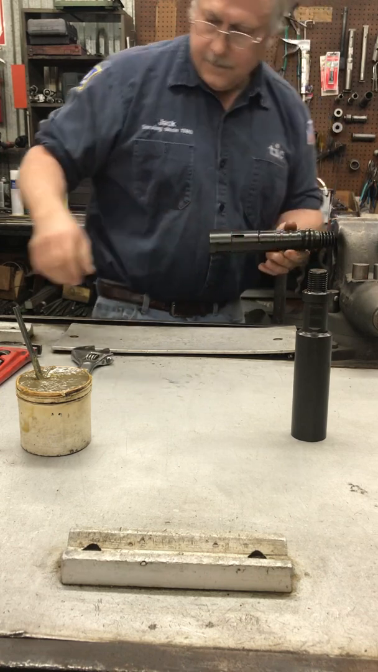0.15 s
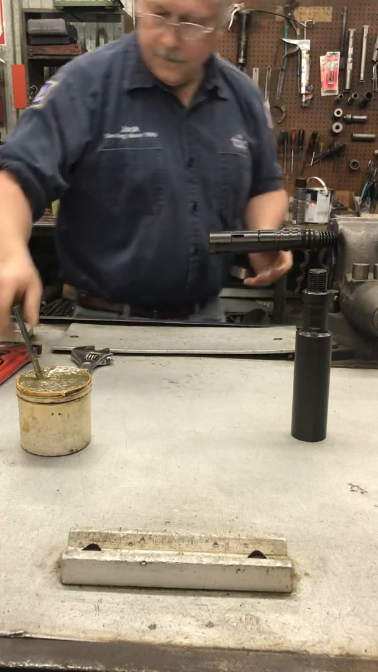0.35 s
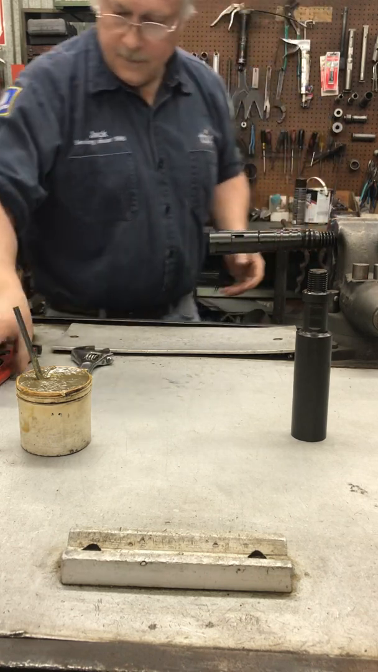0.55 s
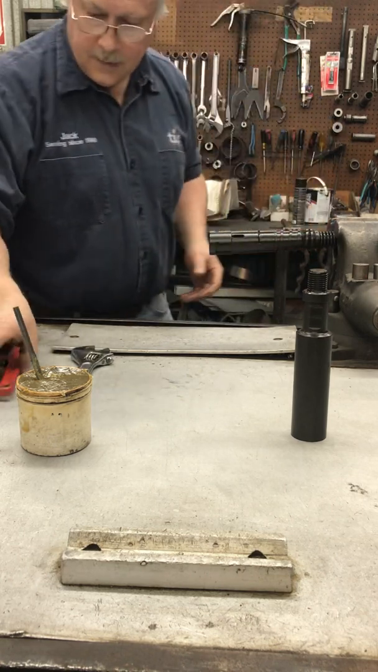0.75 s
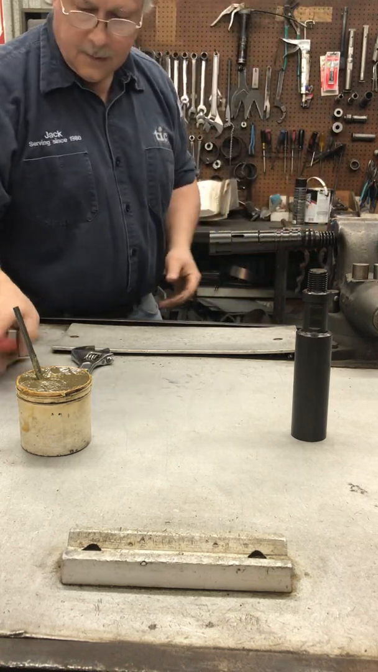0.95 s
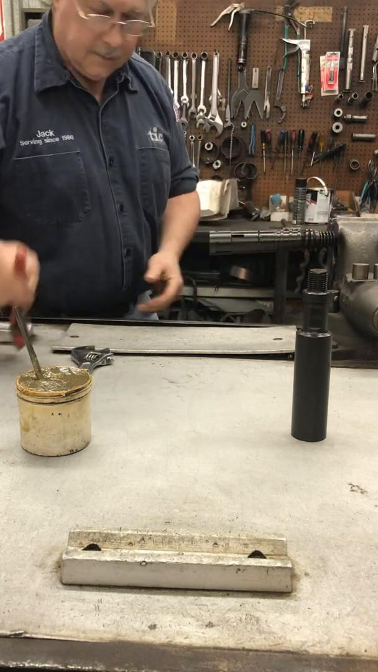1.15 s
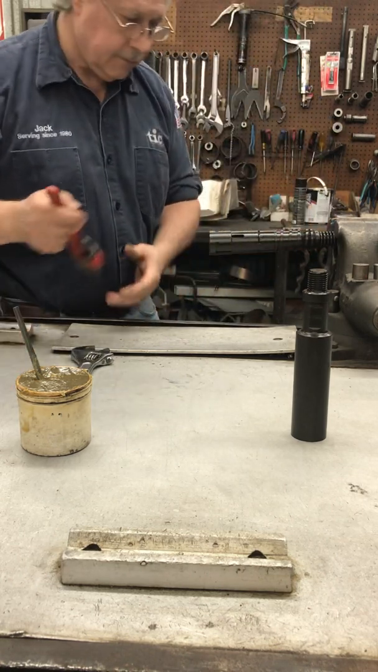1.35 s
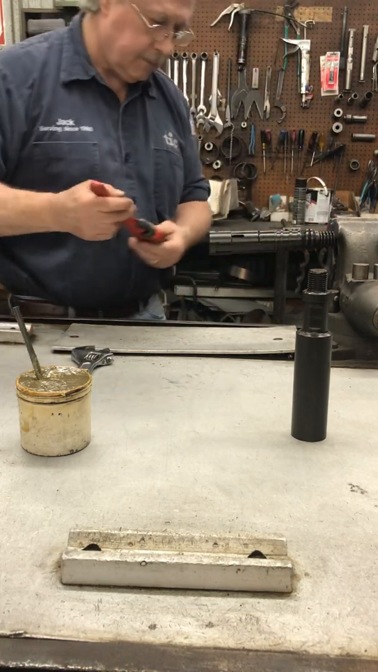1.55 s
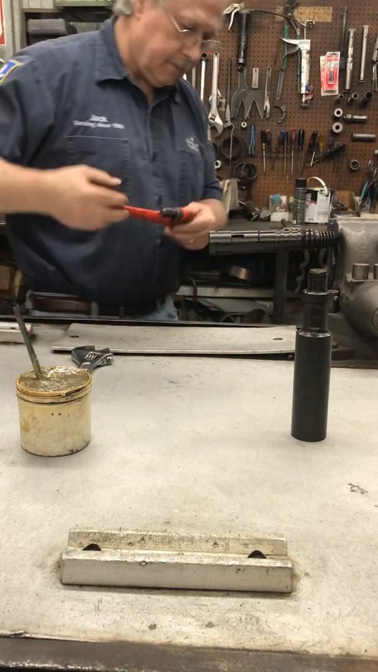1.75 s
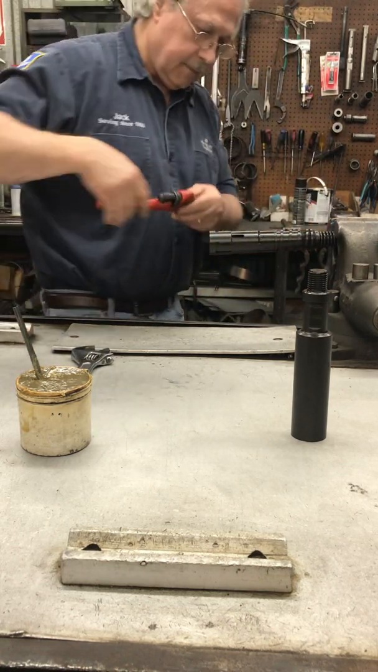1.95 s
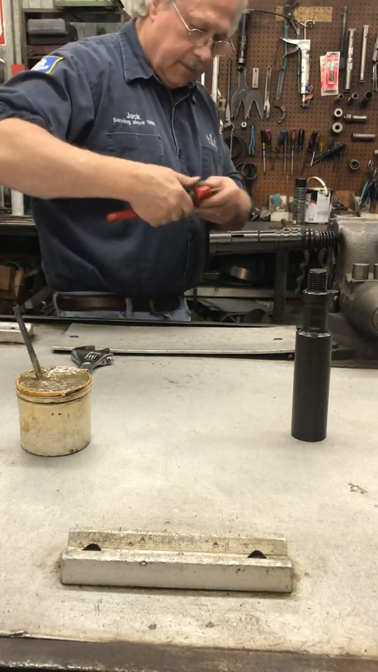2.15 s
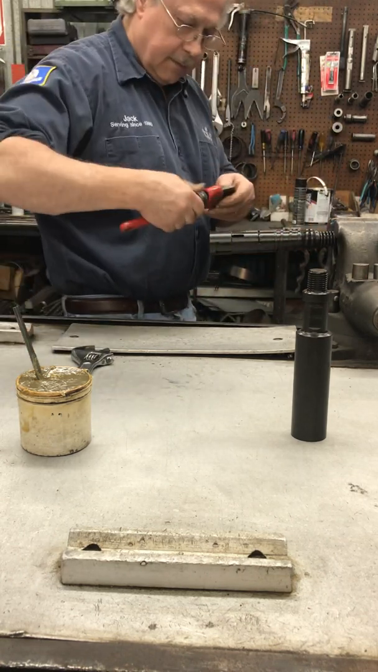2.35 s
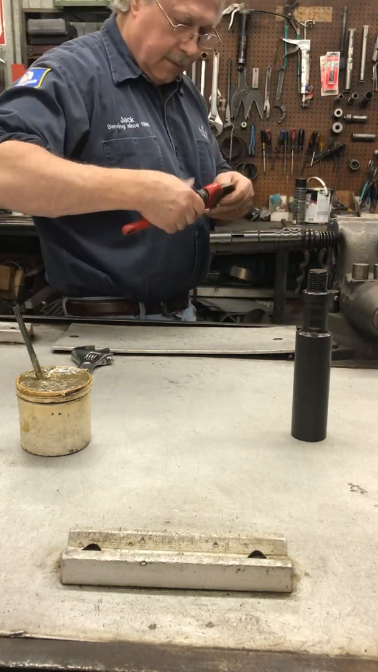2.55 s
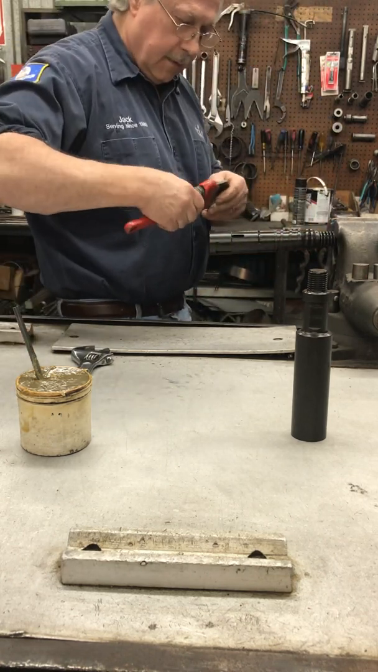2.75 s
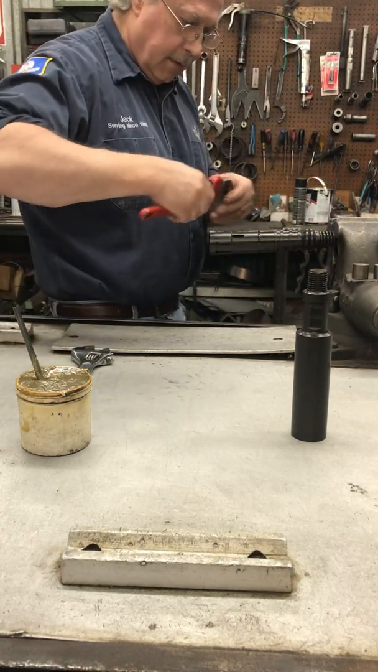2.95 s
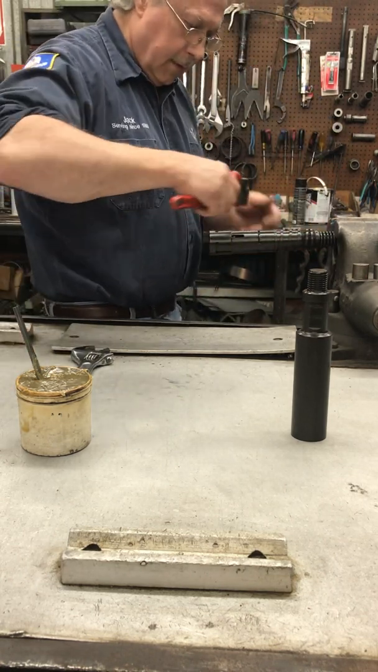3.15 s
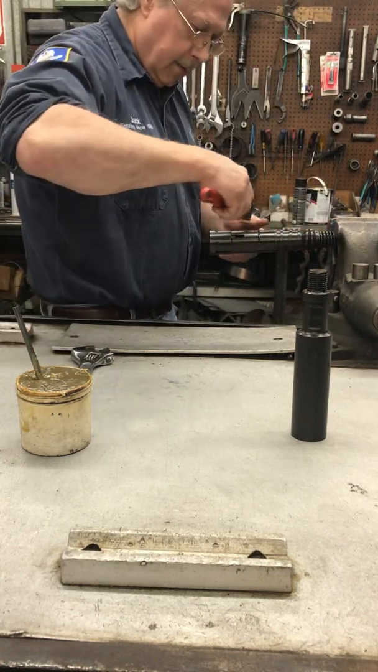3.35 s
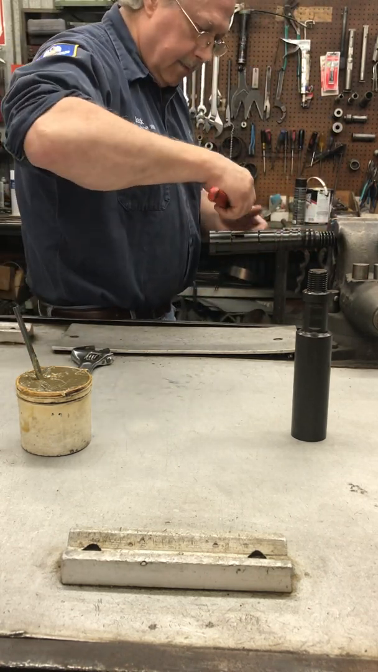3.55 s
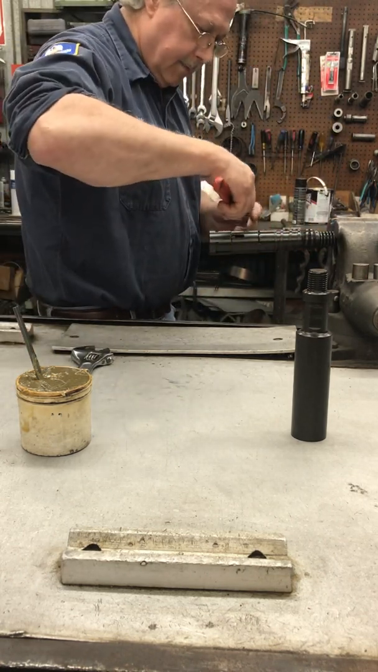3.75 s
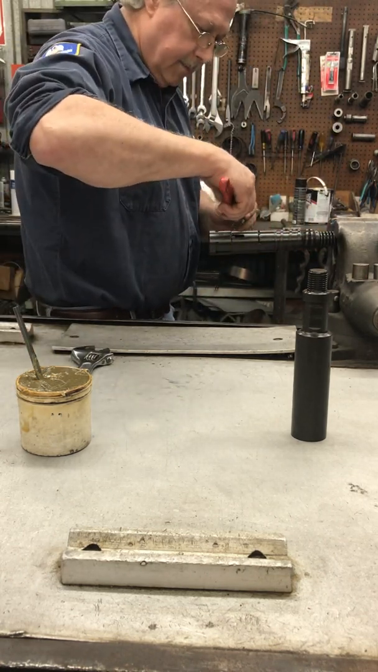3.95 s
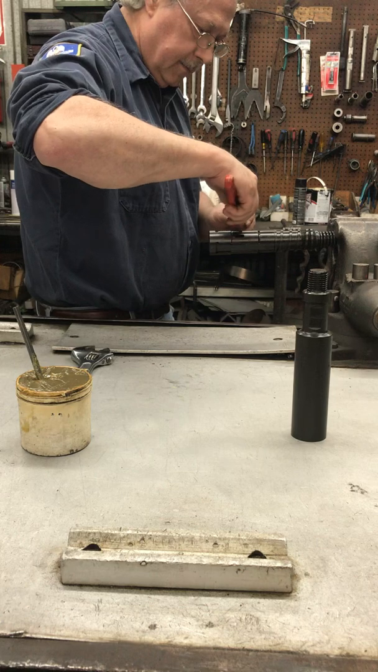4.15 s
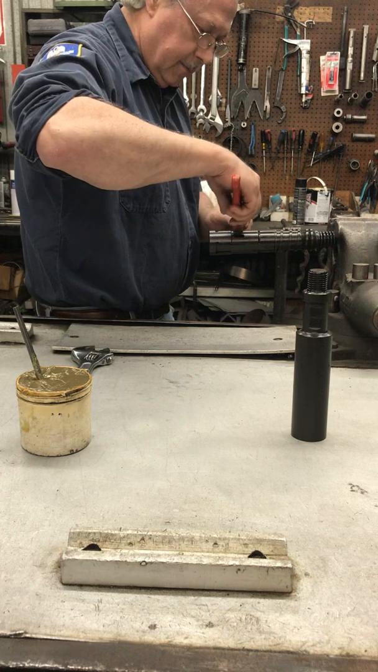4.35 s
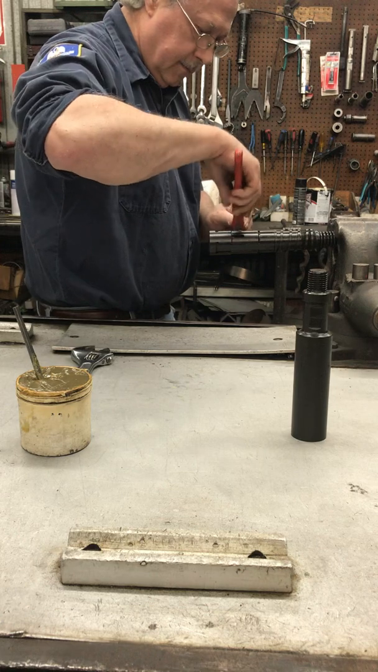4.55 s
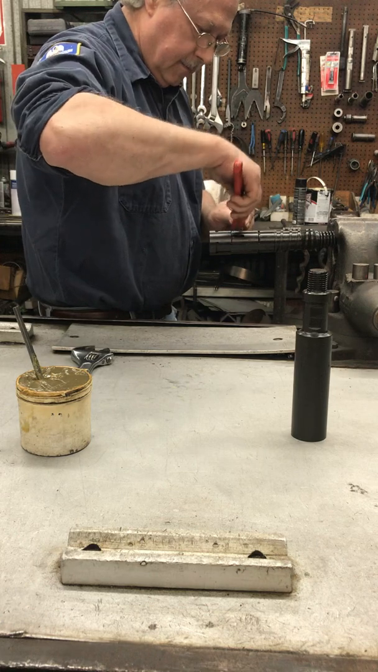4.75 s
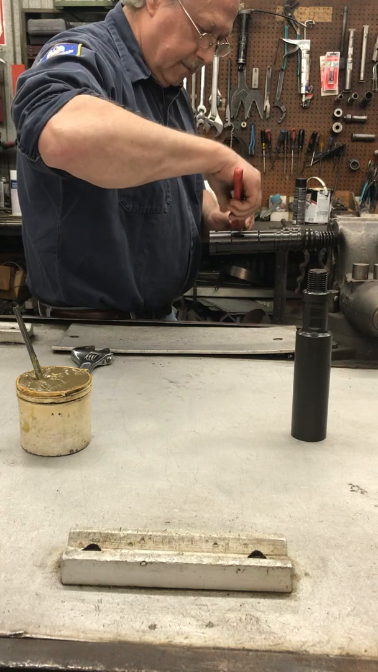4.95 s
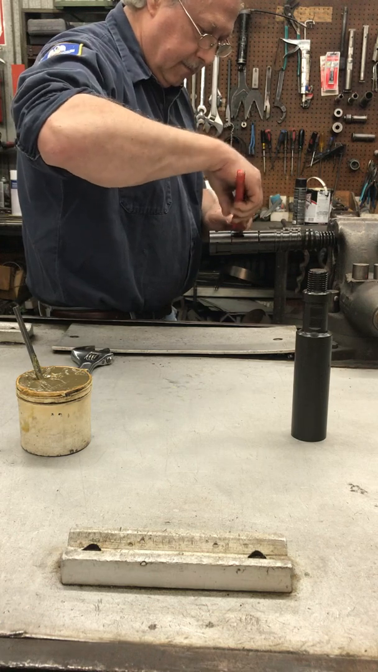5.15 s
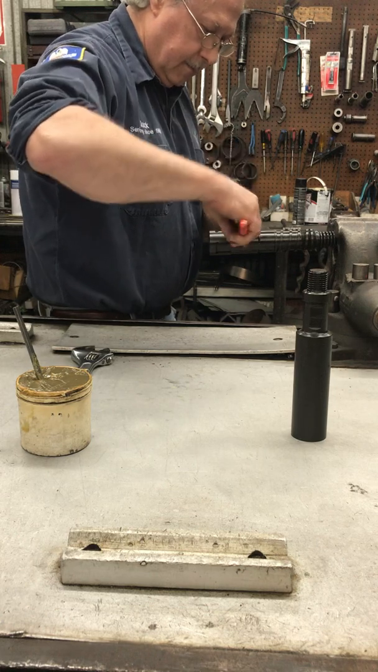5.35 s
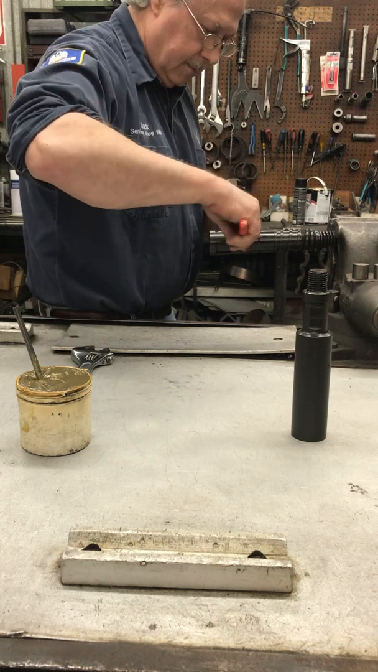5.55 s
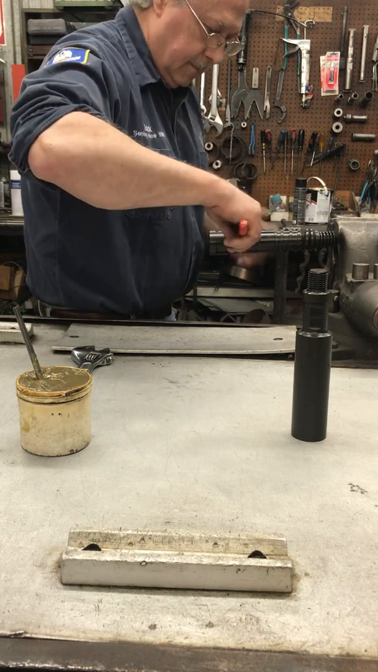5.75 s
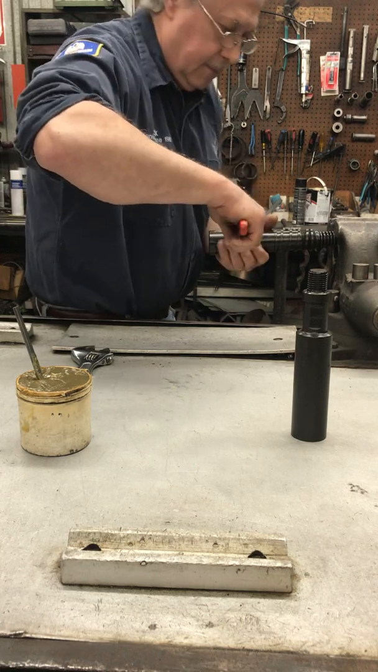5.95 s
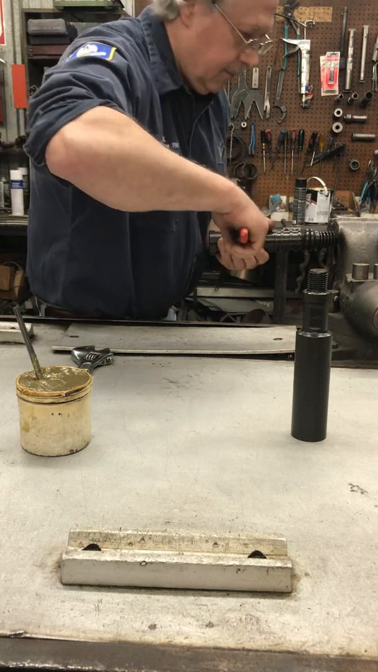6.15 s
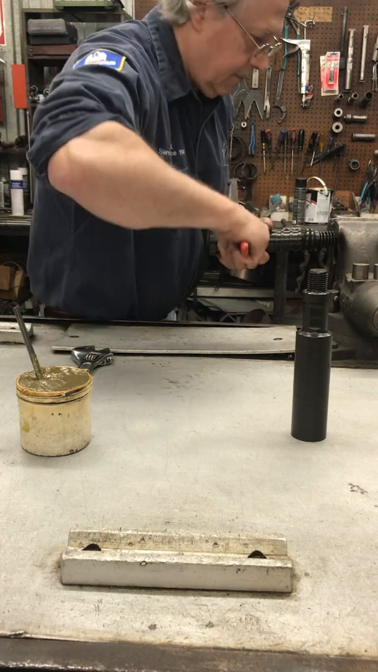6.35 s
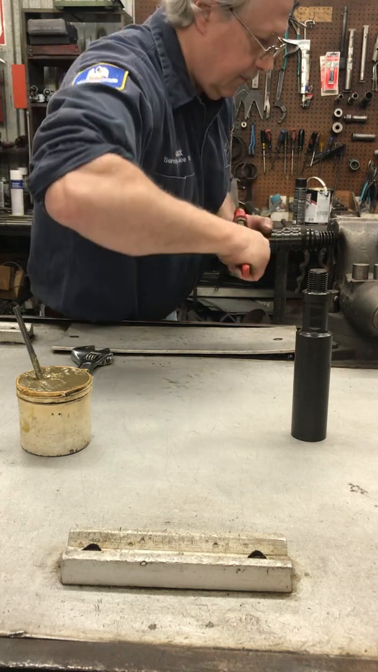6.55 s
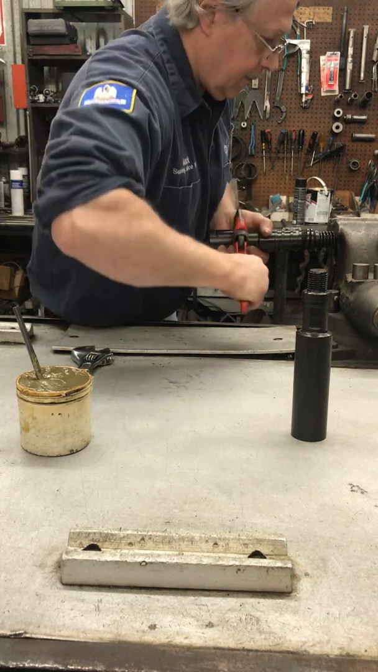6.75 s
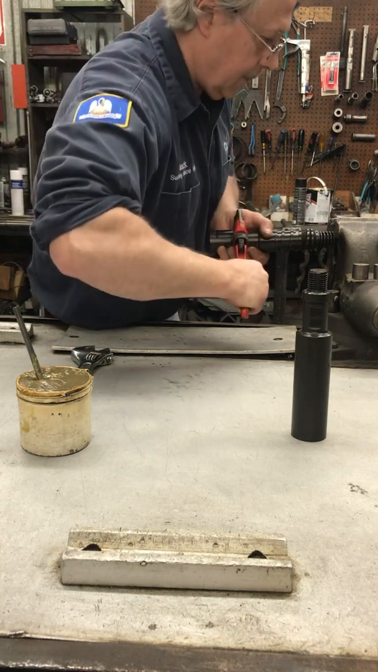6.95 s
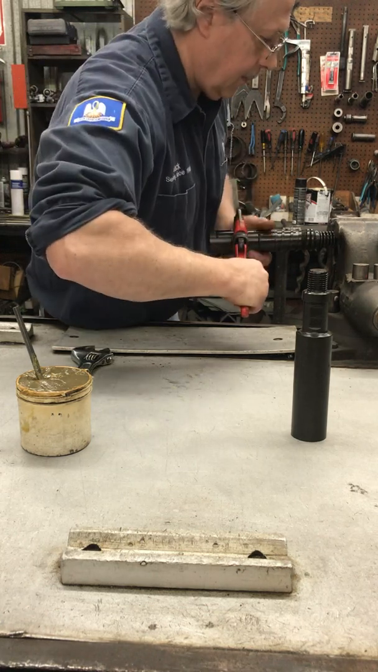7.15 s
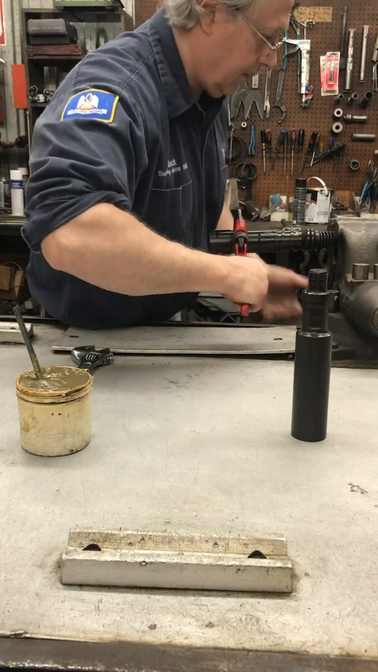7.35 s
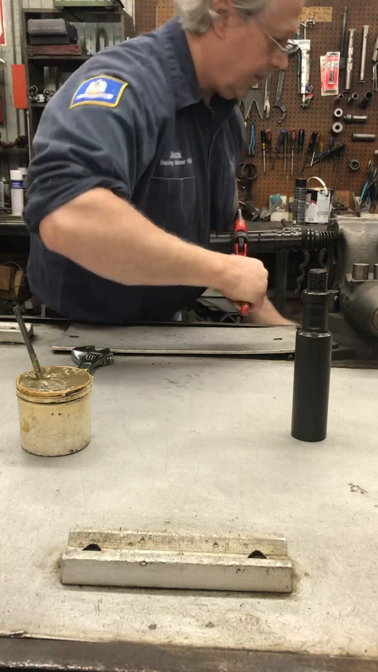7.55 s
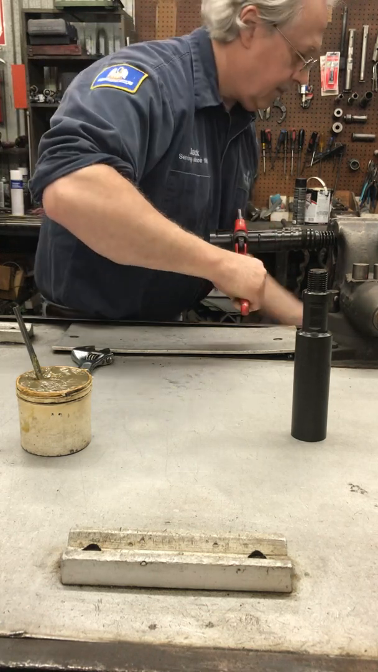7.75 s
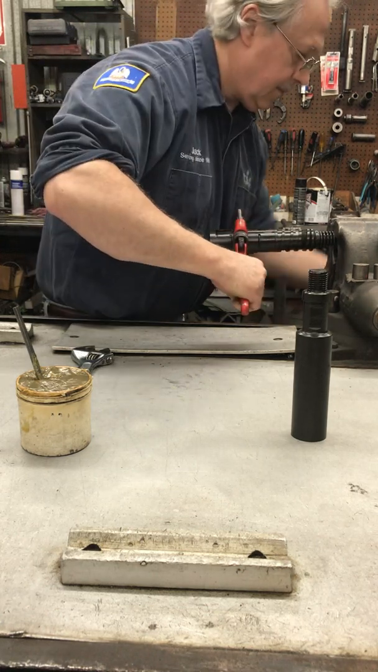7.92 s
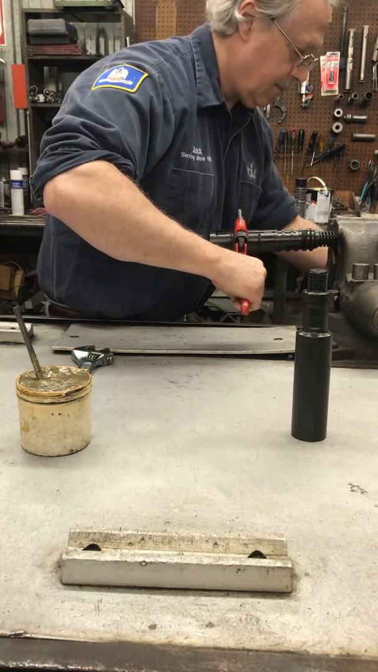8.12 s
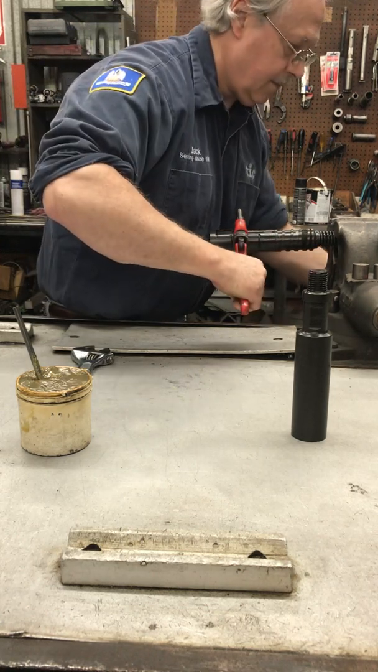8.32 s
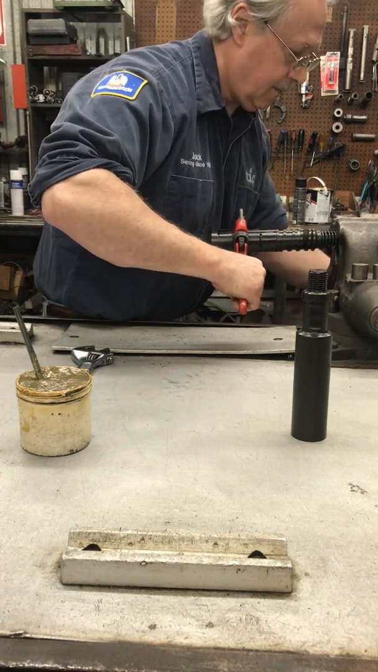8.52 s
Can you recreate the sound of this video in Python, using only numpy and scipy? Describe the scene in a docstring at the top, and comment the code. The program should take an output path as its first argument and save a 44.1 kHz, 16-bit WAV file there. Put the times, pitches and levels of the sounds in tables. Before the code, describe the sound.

A heavy steel wrench scrapes off a metal bench with two loud clanks, then light clicks and ticks as it is adjusted over a low workshop hum.

```python
"""A pipe wrench is dragged off a steel workbench with two loud clanks, adjusted by hand and set on a pipe in a vise.
Clanks mix a bending-wave crack, a noise thud and ringing bench modes; the drag is a stream of tiny slips.
Loose jaw, nut, handle, pipe and vise click as noise bursts and ring as fluttering modes; soft bumps are noise swells.
Machinery hums as shaped noise and wavering tones, and a faint electrical tick repeats about ten times a second."""
import sys
import numpy as np
from scipy import signal
from scipy.fft import rfft, irfft, next_fast_len
from scipy.io import wavfile
from scipy.ndimage import uniform_filter1d, minimum_filter1d

SR = 44100
rng = np.random.default_rng(int(sys.argv[2]) if len(sys.argv) > 2 else 0)


def transcribe(signal):
    """Save signal, clipped to [-1, 1], as a 16-bit WAV file at the path in sys.argv[1]."""
    frames = np.atleast_2d(signal).T
    limited = np.clip(frames, -1, 1)
    pcm = np.round(limited * 32767).astype(np.int16)
    wavfile.write(sys.argv[1], SR, pcm)


N = 382788

# machinery tones: pitch_hz, typical level_db (rms)
MOTOR_TONES = [(55.5, -50.5), (60, -51), (119, -50.5), (208.3, -51), (261, -70), (349, -65.5), (378, -67),
               (526, -74)]
# noise colours, relative levels: pitch_hz, level_db (per Hz)
RUMBLE_COLOUR = [(8, -44.5), (22, -39.5), (33, -16), (44, -9), (54, 3.5), (70, -3), (100, -2.5),
                 (125, -5.5), (160, -10.5), (205, -10), (260, -18.5), (340, -24.5), (480, -37.5),
                 (1200, -73.5)]
AIR_COLOUR = [(200, -4), (400, 3.5), (650, 1.5), (950, -3), (1700, .5), (2050, -4), (2350, -8), (3200, -8),
              (5000, -17.5), (6500, -18), (9000, -25.5), (12000, -24), (13500, -28.5), (16000, -26.5)]
CLICK_COLOUR = [(250, -15), (700, -17), (1500, -12), (2100, -2), (2350, -23.5), (2700, 1.5), (3400, -0.5),
                (4200, -7.5), (5300, -11.5), (6000, -15), (7200, -11), (8000, -22), (13000, -19.5),
                (16000, -20)]
TICK_COLOUR = [(800, -11.5), (2500, 5.5), (4000, 4), (5200, -6), (6600, 4.5), (8500, -17.5), (13000, -9),
               (15500, -6.5)]
SCRAPE_COLOUR = [(150, -27.5), (400, 7.5), (600, 3.5), (1900, -1), (2400, -11), (3200, -6), (4600, -7.5),
                 (5500, -21), (7000, -41.5), (9000, -50.5), (15000, -53)]
CRACK_COLOUR = [(150, -33), (400, -4.5), (700, 7.5), (1900, -1.5), (2400, -13.5), (3300, -1), (4100, 7.5),
                (4900, -7.5), (5800, -10.5), (7000, -26.5), (9000, -44), (16000, -46)]
THUD_COLOUR = [(120, -26), (300, -14.5), (600, -5), (2000, 5.5), (2400, -4.5), (3200, -7.5), (4400, -20),
               (5400, -5), (7200, -27), (8000, -36), (16000, -51.5)]
BUMP_COLOUR = [(60, -10), (130, 7.5), (300, 5.5), (450, -7.5), (800, -5.5), (1400, -14), (2200, -26),
               (3300, -25), (5000, -55), (12000, -62)]

# loose steel parts meeting: start_s, part struck, relative click_db, relative ring_db,
# contact brightness_hz, ring length factor (a grip shortens it)
PART_CLINKS = [(.002, "vise", -43.5, -50.5, 7000, 0.67), (0.64, "jaw", -31, -40, 6400, .35),
               (.887, "jaw", -16, -23.5, 7000, 0.4), (1.095, "jaw", -21, -27, 11000, 0.86),
               (1.101, "nut", -27, -30, 2700, 0.51), (1.608, "jaw", -41.5, -46.5, 7000, 0.27),
               (1.685, "jaw", -38.5, -36.5, 6000, 0.16), (2.317, "nut", -44, -59, 9000, .2),
               (2.39, "nut", -44, -58, 9200, .55), (2.689, "handle", -35, -48, 8950, .4),
               (2.7138, "nut", -25, -31, 7600, 0.55), (2.906, "nut", -50, -55, 4970, .4),
               (2.958, "jaw", -39.5, -47, 4560, 0.44), (3.479, "handle", -41, -56, 8750, 0.88),
               (3.516, "jaw", -28.5, -32.5, 7000, 0.95), (3.763, "nut", -44, -53.5, 9100, 0.39),
               (3.7755, "pipe", -29.5, -38, 8000, 0.15), (3.78, "jaw", -49, -35.5, 11000, .38),
               (3.85, "jaw", -32.5, -35.5, 3970, 0.9), (4.203, "pipe", -54, -40, 2960, 0.59),
               (4.6046, "nut", -41, -62, 6500, .4), (4.792, "nut", -36, -52, 8000, .4),
               (4.797, "handle", -31.5, -30.5, 8900, 0.43), (4.806, "pipe", -27, -36, 9000, 0.47),
               (4.812, "jaw", -35, -40, 6000, 0.86), (4.8308, "pipe", -42, -41, 8000, 0.57),
               (5.2968, "pipe", -28, -19.5, 4470, 0.09), (5.298, "handle", -40, -31.5, 6000, 0.055),
               (5.3414, "nut", -38, -62, 9000, .2)]
# ringing modes of each part, before the grip: pitch_hz, relative level_db, decay_s (to -60 dB)
VISE_MODES = [(2630, -4, 0.32), (4020, -1, 0.44), (6000, -12, .2)]
JAW_MODES = [(3128, -27, .28), (3300, -3, 0.12), (3343, -1, 0.27), (5370, -29, .25), (5770, -16.5, 0.193),
             (6500, -20, 0.37), (6995, -6, 0.41), (7100, -5.5, 0.17), (6900, -18, .2), (10060, -17.5, .28),
             (12700, -22, .22)]
NUT_MODES = [(1290, -5, .13), (2047, -20, .49), (3400, 12.5, 0.067), (3490, -10.5, .48), (3700, -3, 0.25),
             (3800, -15, .41), (8260, -7.5, 0.13), (8570, -1, .48)]
HANDLE_MODES = [(4370, -7, .14), (4820, 2, .3), (5400, -9, .1), (7386, -21, .3), (8400, -9, .33)]
PIPE_MODES = [(2006, -3, 0.17), (2180, -15, 0.49), (2635, 8, 0.2), (2700, -17, .12), (3720, -29, 0.27)]
PARTS = {"jaw": JAW_MODES, "nut": NUT_MODES, "pipe": PIPE_MODES, "handle": HANDLE_MODES, "vise": VISE_MODES}
# a blow throws the loose jaw or nut into a rattle a moment later, at levels relative to the blow
RATTLE_DELAY_S, RATTLE_CLICK_DB, RATTLE_RING_DB = .006, -7.5, -19
SEATING_S = .0016  # the parts take a moment to seat
LOOSENESS = .27  # flutter depth of the ringing parts

TICK_START_S, TICK_PERIOD_S, TICK_GAP_S = .0669, .10234, .0011

# strokes of the wrench sliding on the bench: start_s, time to the peak_s, peak level_db
DRAG_STROKES = [(.493, .032, -34.5), (.556, .068, -32.5), (.79, .085, -47.5), (.895, .035, -32),
                (1.035, .035, -37.5)]
STROKE_ATTACK_S, STROKE_SWELL_DB, STROKE_RELEASE_DB_PER_S = .012, 10.5, 515.5
SLIPS_PER_S = 5000

# steel knocking on bench and vise: start_s, relative level_db, first contact brightness_hz,
# gap to the first bounce_s, change per bounce_db
STEEL_CLANKS = [(.558, -34.5, 7000, 0.018, -15), (0.6278, -16, 4540, 0.016, -3),
                (0.8798, -8, 5900, 0.0062, .6), (1.0, -25.5, 3500, .006, -23), (2.089, -42, 1680, 0.025, 2),
                (4.206, -42, 2460, .01, -5), (5.2973, -35, 7500, .016, -4.5), (5.353, -36.5, 3000, .01, -6),
                (8.24, -35, 893, 0.017, 1)]
BOUNCE_SHRINK, BOUNCE_DULLING = .53, .64  # factors per bounce on the gap and the brightness
# bench modes, before the knock shortens them: pitch_hz, relative level_db, decay_s (to -60 dB)
BENCH_MODES = [(494, -11, 0.077), (622.6, 3, 0.096), (658, -12, 0.11), (700, -8.5, 0.0493), (869, -8, .08),
               (962, 0, 0.067), (1097, -4, 0.15), (1213, -5, .11), (1404, -8.5, 0.32), (1570, -2.5, 0.072),
               (1670, -17, .05), (1850, -7, .072), (1886, 1.5, .045), (2036, .5, .05), (2824, -9, 0.078),
               (3206, -9.5, 0.0617), (3500, -16.5, 0.065), (3690, -15, 0.1), (3880, -10.5, 0.022),
               (3868, -2, 0.04), (4270, -1, 0.053), (4417, 0.5, 0.056), (4660, 4.5, .025),
               (5190, -21, 0.066)]

# soft bumps of hand and tool on the vise: start_s, level_db, swell_s (time to the peak)
SOFT_BUMPS = [(.632, -32.5, 0.0087), (2.087, -48, 0.0091), (5.314, -40.5, 0.013), (8.215, -39, .023),
              (8.295, -49, 0.011), (8.381, -41, 0.0043)]

# room reverberation: pitch_hz, decay_s (to -60 dB)
ROOM_DECAY = [(150, 1), (600, 0.48), (2000, 0.48), (4000, 0.39), (8000, 0.63), (15000, 0.39)]
NOTCH_HZ, NOTCH_Q = 10360, 9.8
CEILING, EDGE_HZ = .85, 15900  # limiter amplitude and top of the band


def gain_of(db):
    """Decibels to amplitude."""
    return 10 ** (np.asarray(db) / 20)


def evened(x):
    """Scales to an rms of one."""
    return x / np.sqrt(np.mean(x ** 2) + 1e-20)


def read(points, hz):
    """Reads a table along a log-frequency axis."""
    f, value = np.transpose(points)
    return np.interp(np.log(hz + 1), np.log(f + 1), value)


def add(mix, start_s, sound):
    """Mixes a sound in at a time."""
    part = mix[max(round(start_s * SR), 0):][:len(sound)]
    part += sound[:len(part)]


def coloured(x, colour):
    """Gives a signal a spectrum, at an rms of one."""
    size = next_fast_len(len(x))
    level_db = read(colour, np.fft.rfftfreq(size, 1 / SR))
    shaped = irfft(rfft(x, size) * gain_of(level_db), size)
    return evened(shaped[:len(x)])


def drift(rate_hz):
    """Slow random wandering up to a rate, at an rms of one."""
    size = next_fast_len(N)
    f = np.fft.rfftfreq(size, 1 / SR)
    slowed = rfft(rng.standard_normal(size)) / (1 + (f / rate_hz) ** 4)
    return evened(irfft(slowed, size)[:N])


def soften(x, brightness_hz):
    """Low-passes a blow: a longer contact excites less treble."""
    return signal.lfilter(*signal.butter(2, min(brightness_hz, .45 * SR), fs=SR), x)


def ring(modes, scatter_db, length=1, rattle=0):
    """Dying modes; where the blow lands shifts strengths and signs, and loose joints make each one flutter."""
    t = np.arange(SR // 2) / SR
    strength, sign = rng.standard_normal(len(modes)), rng.choice([-1, 1], len(modes))
    # complex noise flutters both level and phase
    shake = rng.standard_normal((len(modes), 160, 2)) @ np.array([1, 1j])
    shake_t = np.linspace(0, t[-1], shake.shape[1])
    out = np.zeros(len(t))
    for k, (pitch_hz, level_db, decay_s) in enumerate(modes):
        flutter = 1 + rattle * np.interp(t, shake_t, shake[k])
        fade = gain_of(level_db + scatter_db * strength[k] - 60 * t / (decay_s * length))
        out += sign[k] * fade * (flutter * np.exp(2j * np.pi * pitch_hz * t)).imag
    return out


def burst(colour, decay_s):
    """Countless heavily damped modes blur into a short noise burst."""
    t = np.arange(SR // 2) / SR
    return coloured(rng.standard_normal(len(t)), colour) * gain_of(-60 * t / decay_s)


def machinery():
    """Fan rumble, rushing air and motor tones that waver in level and phase."""
    t = np.arange(N) / SR
    rumble = gain_of(-39.5) * coloured(rng.standard_normal(N), RUMBLE_COLOUR)
    air = gain_of(-57.0 + .18 * drift(2.4)) * coloured(rng.standard_normal(N), AIR_COLOUR)
    tones = np.zeros(N)
    for pitch_hz, level_db in MOTOR_TONES:
        level = gain_of(level_db + 2.48 * drift(2.4)) * np.sqrt(2)  # rms to peak
        tones += level * np.sin(2 * np.pi * pitch_hz * t + .85 * drift(1.6))
    return rumble + air + tones


def clinks():
    """Each contact clicks and rings its part, then rattles the jaw (or the nut, if the jaw was struck)."""
    clicks, rings = np.zeros((2, N))
    seating = 1 - np.exp(-np.arange(SR // 2) / SR / SEATING_S)
    for start_s, part, click_db, ring_db, brightness_hz, length in PART_CLINKS:
        blow = (start_s, PARTS[part], click_db, ring_db)
        loose = NUT_MODES if part == "jaw" else JAW_MODES
        rattle = (start_s + RATTLE_DELAY_S, loose, click_db + RATTLE_CLICK_DB, ring_db + RATTLE_RING_DB)
        for at_s, modes, tap_db, tone_db in (blow, rattle):
            tone = gain_of(-3.0) * ring(modes, scatter_db=3.5, length=length, rattle=LOOSENESS)
            tap = burst(CLICK_COLOUR, decay_s=.03)
            add(clicks, at_s, soften(seating * gain_of(tap_db) * tap, brightness_hz))
            add(rings, at_s, soften(seating * gain_of(tone_db) * tone, brightness_hz))
    return clicks, rings


def interference():
    """A faint electrical double tick, as a current switches on and off."""
    out = np.zeros(N)
    starts = np.arange(TICK_START_S, N / SR, TICK_PERIOD_S)
    for start_s, size_db in zip(starts, rng.standard_normal(N // 1000)):
        add(out, start_s, gain_of([size_db - 4]))
        add(out, start_s + TICK_GAP_S, -gain_of([size_db]))
    return gain_of(-72) * coloured(out, TICK_COLOUR)


def slide():
    """Dragged steel catches and slips in tiny impacts; each stroke swells as it gathers speed, then stops."""
    slips = rng.standard_normal(N) * (rng.random(N) < SLIPS_PER_S / SR)
    force, t = np.zeros(N), np.arange(SR // 2) / SR
    for start_s, peak_s, level_db in DRAG_STROKES:
        swell_db = STROKE_SWELL_DB * (t / peak_s - 1)
        release_db = STROKE_RELEASE_DB_PER_S * (peak_s - t)
        attack = np.minimum(t / STROKE_ATTACK_S, 1)
        add(force, start_s, attack * gain_of(level_db + np.minimum(swell_db, release_db)))
    return coloured(slips, SCRAPE_COLOUR) * force


def bending_wave(colour, travel_s):
    """A blow crosses a steel plate as a falling chirp, as treble travels faster than bass."""
    hz = np.fft.rfftfreq(SR // 2, 1 / SR)
    # delay is travel_s * (sqrt(1000 / hz) - 1/4), so 16 kHz lands at time zero
    turns = 2 * travel_s * np.sqrt(1000 * hz) - travel_s * hz / 4
    wave = irfft(gain_of(read(colour, hz)) * np.exp(-2j * np.pi * turns), SR // 2)
    wave = wave * np.linspace(1, 0, SR // 2)
    return wave / np.linalg.norm(wave)


def knock():
    """One contact of heavy steel: a hard crack, a thud and the rattling ring of the bench."""
    crack = gain_of(16.0) * bending_wave(CRACK_COLOUR, travel_s=.002332)
    body = gain_of(-10.0) * ring(BENCH_MODES, scatter_db=1.5, length=.7, rattle=.13)
    thud = gain_of(-7.0) * burst(THUD_COLOUR, decay_s=.037)
    return crack + body + thud


def clanks(count=3):
    """The wrench knocks and bounces twice, ever sooner and ever duller, growing weaker or slightly stronger."""
    out = np.zeros(N)
    for start_s, level_db, brightness_hz, gap_s, bounce_db in STEEL_CLANKS:
        at_s = start_s
        for k in range(count):
            force = gain_of(k * bounce_db)
            contact = soften(knock(), brightness_hz * force * BOUNCE_DULLING ** k)
            add(out, at_s, gain_of(level_db) * force * contact)
            at_s = at_s + gap_s * BOUNCE_SHRINK ** k
    return out


def bumps():
    """Padded contacts swell and fade without ringing."""
    out, t = np.zeros(N), np.arange(SR // 2) / SR
    for start_s, level_db, swell_s in SOFT_BUMPS:
        swell = t / swell_s * np.exp(1 - t / swell_s)
        add(out, start_s, gain_of(level_db) * coloured(rng.standard_normal(len(t)), BUMP_COLOUR) * swell)
    return out


def workshop(x):
    """Dense reflections of random sign, each band dying at its own speed."""
    taps = rng.choice([-1., 1.], SR) * (rng.random(SR) < 4000 / SR)  # about 4000 per second
    taps = taps * (np.arange(SR) / SR > .005)  # none in the first 5 ms
    hz, t, bands = signal.stft(taps, SR, nperseg=256)
    fade = gain_of(-60 * t / read(ROOM_DECAY, hz)[:, None])
    tail = signal.istft(bands * fade, SR, nperseg=256)[1]
    return signal.fftconvolve(x, tail / np.linalg.norm(tail))[:N]


def scene():
    """The bench is near the microphone; clicks at the vise are farther off and wetter."""
    bench = clanks() + slide() + bumps()
    clicks, rings = clinks()
    room = workshop(gain_of(-12.5) * bench + gain_of(-5.5) * clicks + gain_of(-8.0) * rings)
    return (bench + clicks + rings + room + machinery() + interference())[None]


def record(dry):
    """The microphone port cuts a dip in the treble, a quick limiter holds down peaks; then the band limit."""
    heard = dry - .6 * signal.lfilter(*signal.iirpeak(NOTCH_HZ, NOTCH_Q, SR), dry)
    allowed = CEILING / np.maximum(abs(heard), CEILING)
    heard = heard * uniform_filter1d(minimum_filter1d(allowed, size=64), size=64)
    lowpass = signal.firwin(511, EDGE_HZ, window=("kaiser", 9), fs=SR)
    return signal.oaconvolve(heard, lowpass[None], "same")


dry = scene()
out = record(dry)
transcribe(out)
```